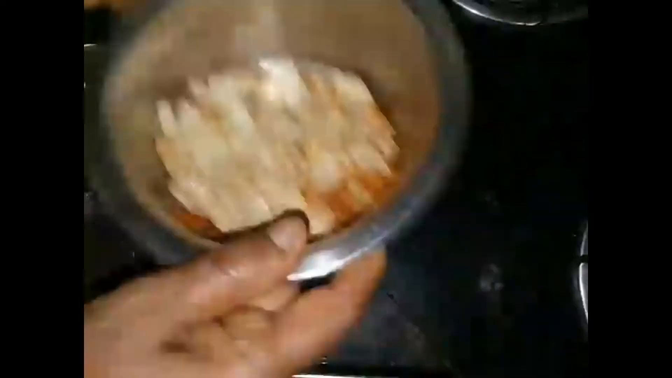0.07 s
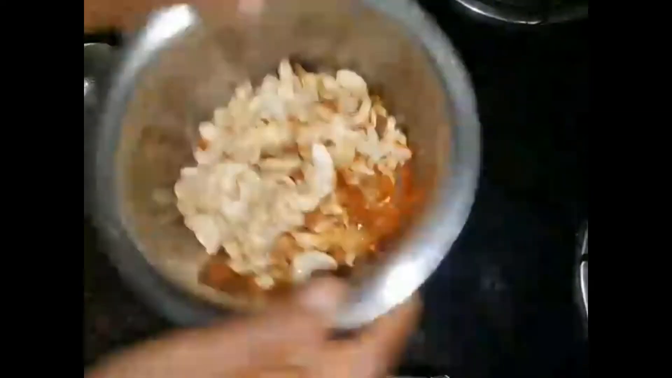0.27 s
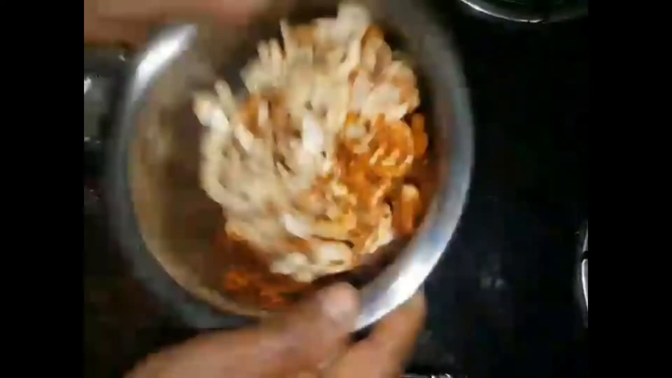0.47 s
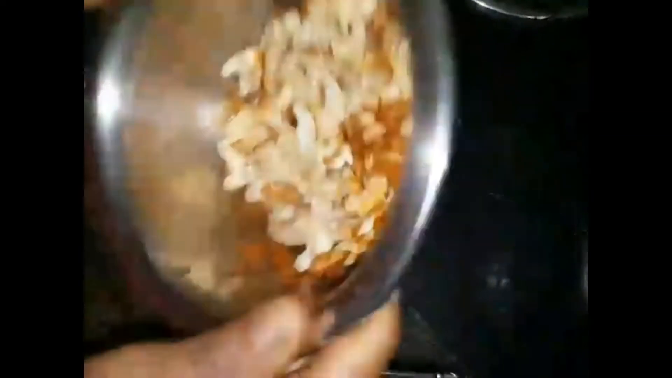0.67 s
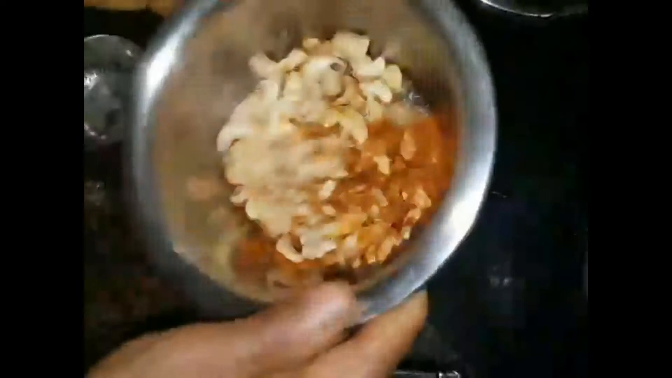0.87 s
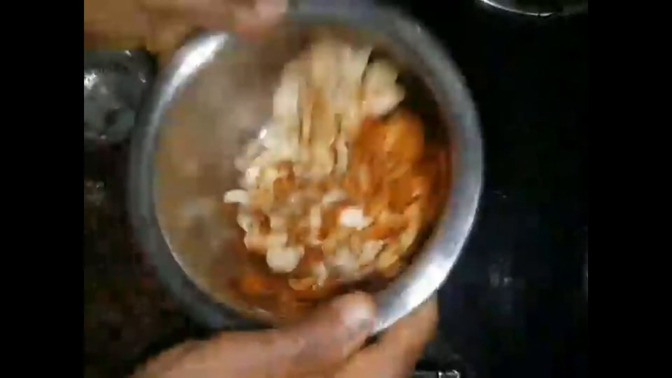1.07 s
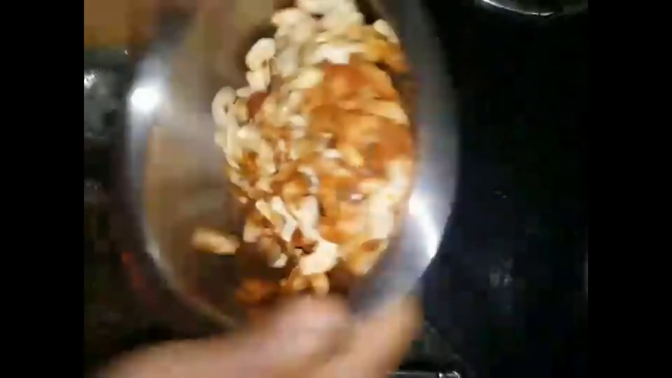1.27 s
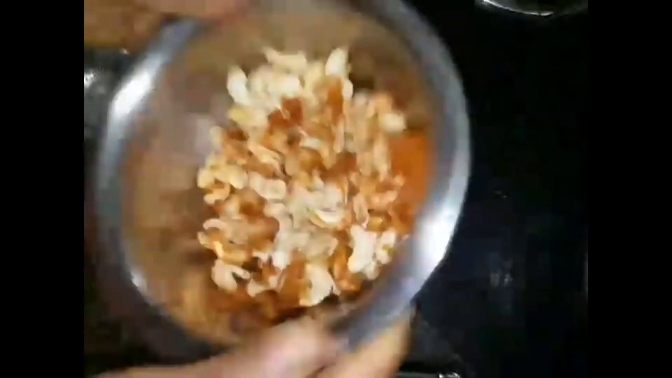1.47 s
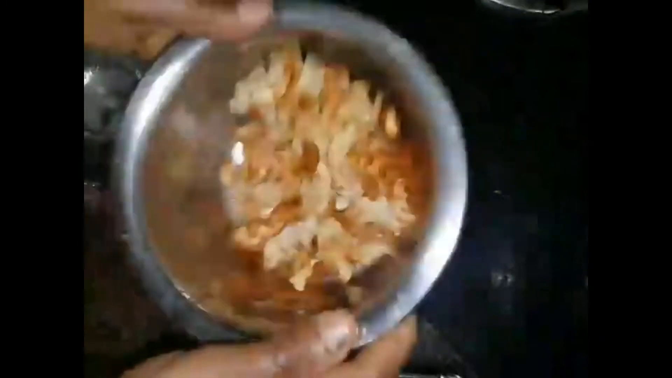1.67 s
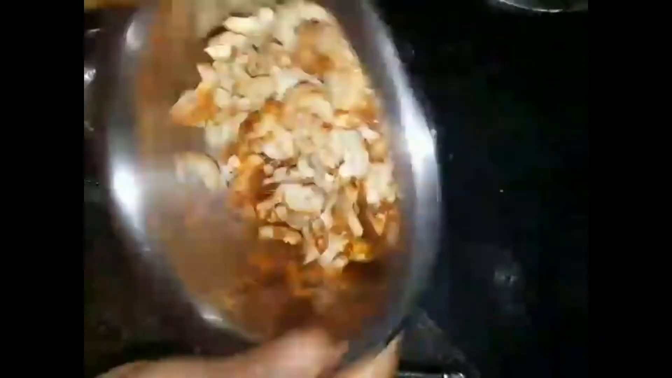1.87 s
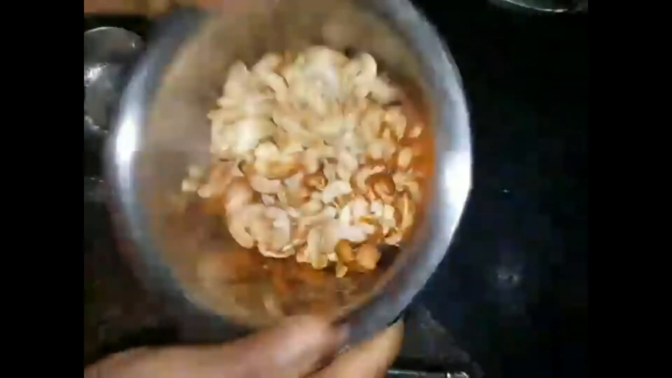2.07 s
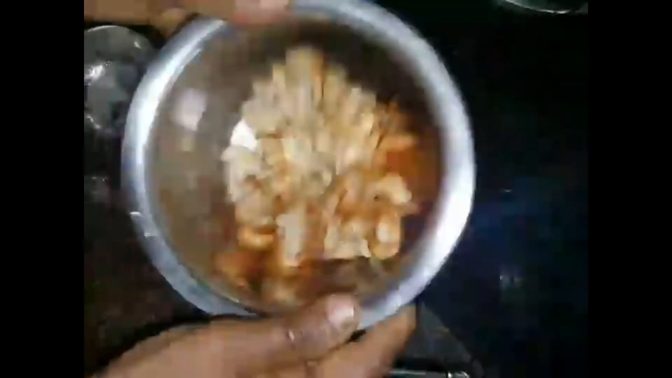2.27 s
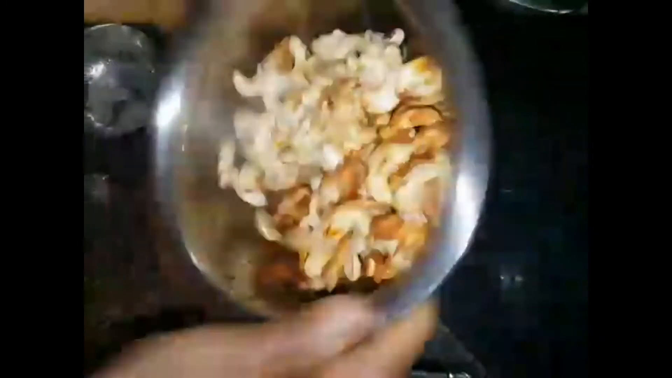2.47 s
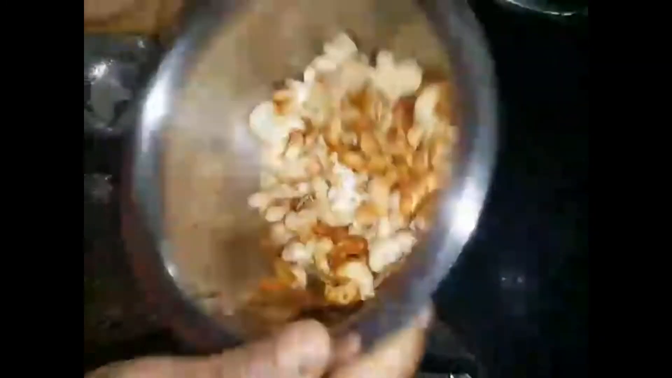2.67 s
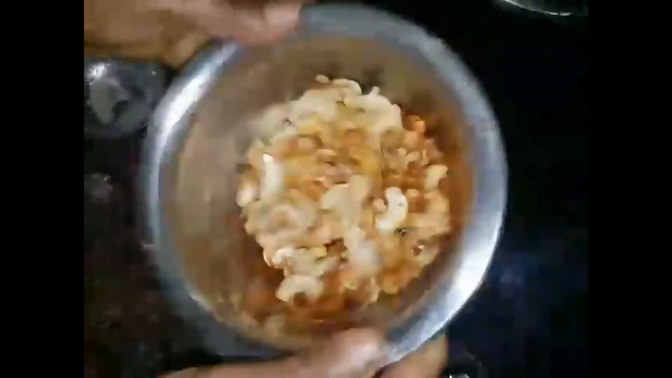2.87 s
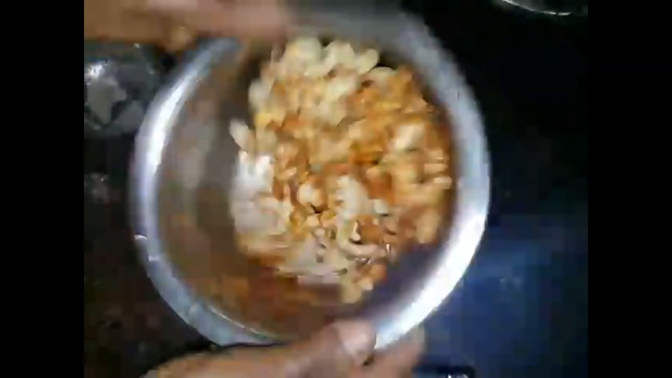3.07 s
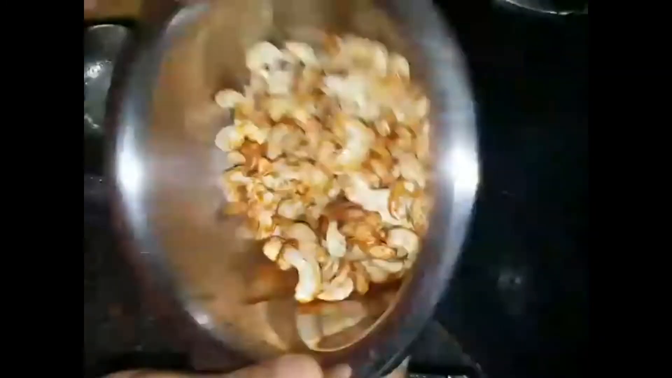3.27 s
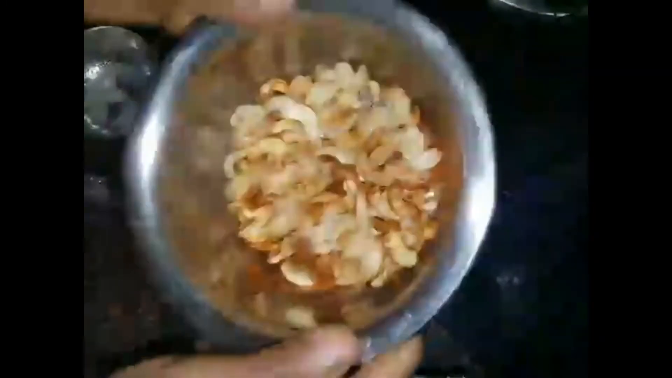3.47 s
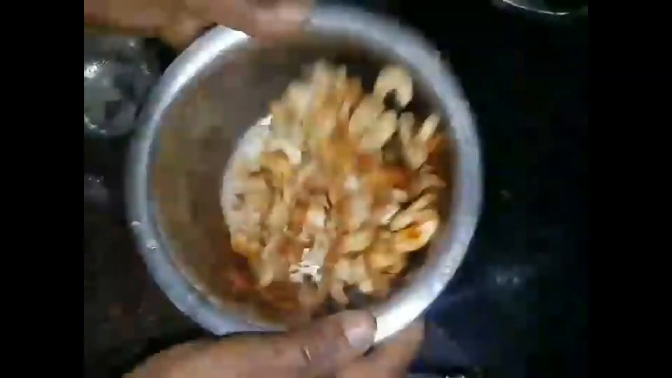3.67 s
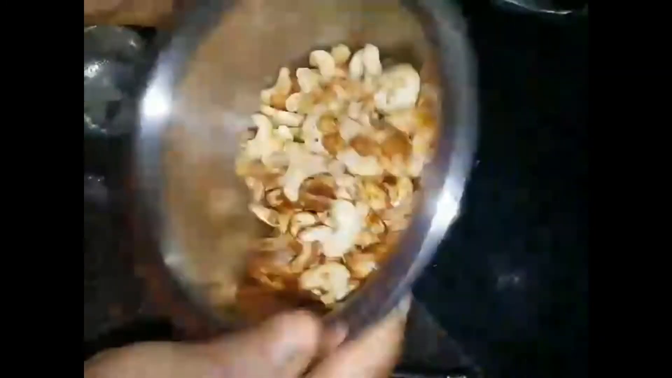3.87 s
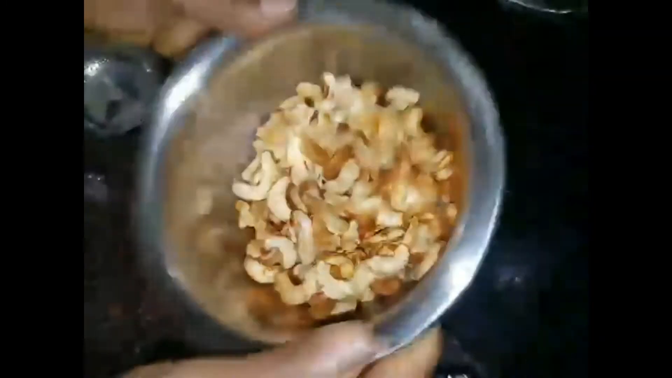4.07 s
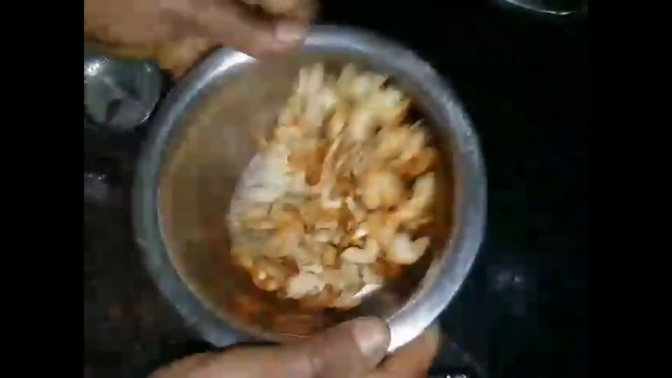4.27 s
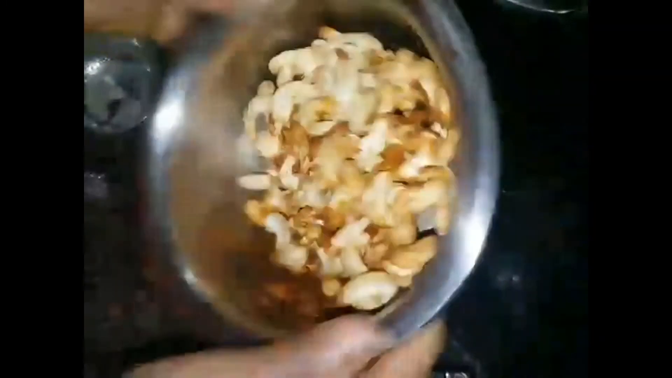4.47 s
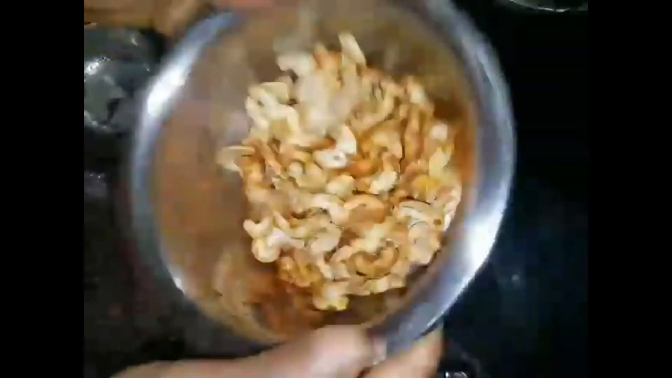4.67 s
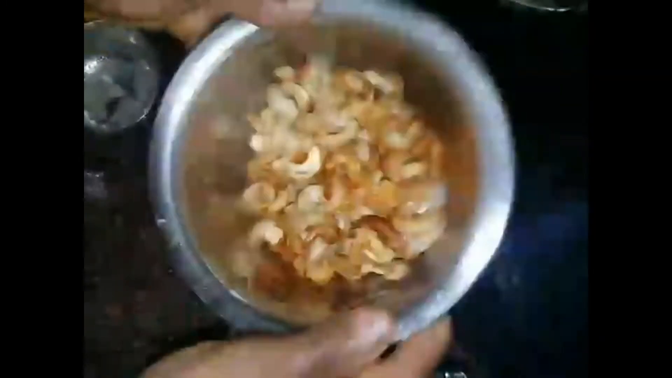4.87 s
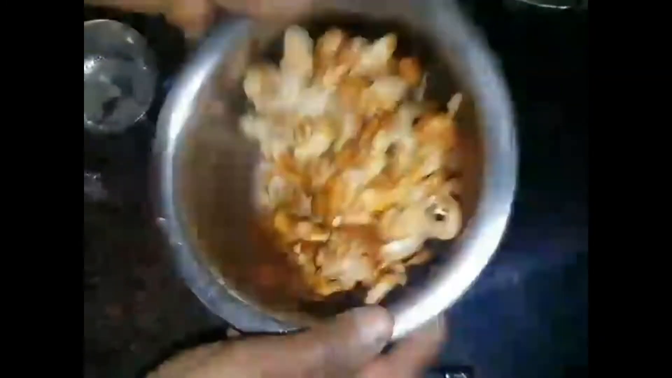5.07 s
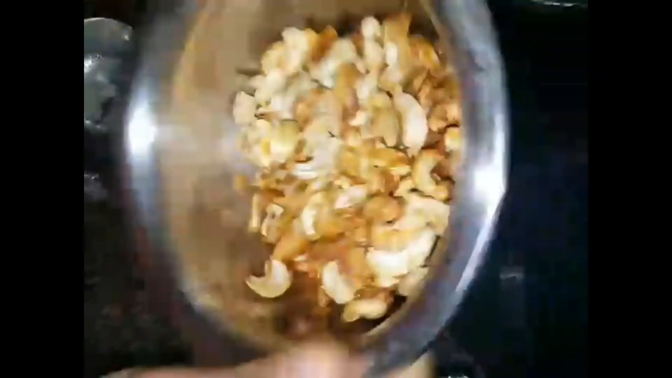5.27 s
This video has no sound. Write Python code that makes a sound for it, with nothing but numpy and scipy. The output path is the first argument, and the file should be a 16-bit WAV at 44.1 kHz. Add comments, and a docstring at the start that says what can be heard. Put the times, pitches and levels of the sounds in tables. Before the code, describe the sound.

Close rhythmic shaking of nuts in a metal bowl, about three and a half tosses a second, with small high clinks over faint room noise.

```python
"""Fried cashews are tossed in a steel bowl, three and a half times a second, close by in a small kitchen.
After three light swirls, each toss thuds onto the base, stray nuts rattle on the wall, then all slide back.
Random impacts drive bowl modes; between landings the nuts roll on and settle, with sparse faint scratches.
Small hard things clink as the hands turn, probably bangles on the wrists: stacks of decaying modes with a tick.
Hard kitchen walls answer through decaying noise, and a steady background of coloured noise lies beneath."""
import sys
import numpy as np
from scipy import signal
from scipy.fft import rfft, irfft, next_fast_len
from scipy.io import wavfile
from scipy.ndimage import uniform_filter1d, map_coordinates

SR = 44100
rng = np.random.default_rng(int(sys.argv[2]) if len(sys.argv) > 2 else 0)


def inscribe(sig):
    """Save sig as 16-bit PCM at rate SR to the path in sys.argv[1].

    A 1-D sig is mono; a 2-D sig holds one channel per row.
    Samples are clipped to [-1, 1] before scaling.
    """
    pcm = np.round(np.clip(np.atleast_2d(sig).T, -1, 1) * 32767)
    wavfile.write(sys.argv[1], SR, pcm.astype(np.int16))


N = 234303  # length in samples

# The landings of the nuts, the first three only light swirls. Each row: start in seconds, base thud in dB,
# wall clang in dB, rattle in dB, seconds until the heap peaks.
LANDINGS = [(0.005, -47, -56, -54.5, 0.024), (0.118, -43, -46, -44.5, .012), (0.232, -45.5, -58, -52, .014),
            (0.508, -18, -26, -24.5, .025), (0.799, -21, -24.5, -28.5, 0.019),
            (1.085, -22.5, -26, -27.5, .009), (1.372, -19.5, -20.5, -25, 0.0065),
            (1.662, -19.5, -24, -24.5, 0.0085), (1.97, -22, -23.5, -25, .019),
            (2.268, -21, -23.5, -26, .012), (2.549, -24, -32.5, -23.5, 0.0091),
            (2.844, -21.5, -22, -27.5, .016), (3.139, -23.5, -24, -26, .013), (3.445, -23, -28, -26, .015),
            (3.72, -23.5, -23, -24.5, .01), (4.021, -24.5, -27.5, -26, 0.019),
            (4.314, -20.5, -22.5, -26, .011), (4.589, -21, -23.5, -24, .012),
            (4.878, -21, -20.5, -24.5, .011), (5.16, -23.5, -23, -22, .01)]
# How alike left and right are. Each row: frequency in Hz, likeness from 0 (unrelated) to 1 (the same).
LIKENESS = [(100, 0.94), (500, 0.78), (800, 0.63), (1300, 0.27), (3000, 0.011), (9000, 0.019)]


def amp(db):
    """Decibels to a linear factor."""
    return 10 ** (np.asarray(db) / 20)


def unit(x):
    """Scale to an RMS of 1 over all channels."""
    return x / np.sqrt(np.mean(x ** 2) + 1e-20)


def norm(x):
    """Scale to a mean energy of 1 per channel."""
    return unit(x) / np.sqrt(x.shape[-1])


def along(points, hz):
    """Read a curve of (Hz, value) points on a log frequency axis."""
    f, v = np.transpose(points)
    return np.interp(np.log(hz + 1), np.log(f), v)


def filtered(x, response):
    """Multiply the spectrum of x by a response of frequency."""
    m = next_fast_len(x.shape[-1] + 8192)
    spectrum = rfft(x, m) * response(np.fft.rfftfreq(m, 1 / SR))
    return irfft(spectrum, m)[..., :x.shape[-1]]


def band(x, lo_hz, hi_hz, order=3):
    """Causal band-pass."""
    sos = signal.butter(order, [lo_hz, min(hi_hz, .49 * SR)], 'band', fs=SR, output='sos')
    return signal.sosfilt(sos, x)


def through(x, response):
    """Convolve, keeping the length."""
    return signal.fftconvolve(np.atleast_2d(x), response, axes=1)[:, :x.shape[-1]]


def add(out, s, x):
    """Mix x into out at time s."""
    i = max(round(s * SR), 0)
    out[:, i:i + x.shape[-1]] += x[:, :N - i]


def noise(spectrum, size):
    """Coloured stereo noise, alike in the bass and nearly unrelated in the treble."""
    def mid_side(hz):
        turn = np.arccos(np.clip(along(LIKENESS, hz), -1, 1)) / 2
        return amp(along(spectrum, hz)) * [np.cos(turn), np.sin(turn)]

    mid, side = filtered(rng.standard_normal((2, size)), mid_side)
    return unit(np.array([mid + side, mid - side]))


def wobble(rate):
    """A smooth random curve, rate knots a second."""
    knots = rng.standard_normal(int(N * rate / SR) + 4)
    return map_coordinates(knots, [np.arange(N) * rate / SR])


def ringing(modes, t, scatter_db, detune, glide):
    """Damped modes at new strengths, bending as their load shifts; high ones differ in phase left and right."""
    hz, db, t60 = np.transpose(modes)[:, :, None]
    z = rng.standard_normal((5, len(modes), 1))
    lag = z[3:] * np.arccos(np.clip(along(LIKENESS, hz), -1, 1)) * 0.54  # one lag per channel
    phase = 2 * np.pi * hz * t * (1 + detune * z[1] + glide * z[2] * t)
    strength = amp(db + scatter_db * z[0] - 60 * t / t60)
    return np.sum(strength * np.sin(phase + lag), axis=1)


def contacts(size, rate, spread_db):
    """Random impacts of uneven force and either sign, rate a second on average."""
    force = amp(spread_db * np.clip(rng.standard_normal(size), -2, 2))
    return force * rng.choice([-1, 1], size) * (rng.random(size) < rate / SR)


def background():
    """Steady kitchen background: wide coloured noise plus a low band of the same colour."""
    # The colour before band-passing. Each row: frequency in Hz, relative level in dB.
    hum_colour = [(15, -51), (25, -22), (139, -4.5), (394, -1.5), (621, -9), (1280, -9.5), (2020, -8.5),
                  (2300, -49), (3540, -13), (4380, -33), (8780, -12.5), (10600, -49), (15000, -9.5)]
    wide = amp(-44) * band(noise(hum_colour, N), 30, 9700, order=1)
    low = amp(-55.5) * unit(band(noise(hum_colour, N), 86, 155, order=2))
    return wide + low


def bowl(pulses, ring, damped_t60, damped_db, count=3):
    """Nuts drive the free modes (ring scales their life); each place struck adds its own dense, choked modes."""
    # The free bowl, base modes first, then the wall.
    # Each row: frequency in Hz, relative level in dB, t60 in seconds before the scaling by ring.
    free_modes = [(522, -17, .2), (585, -5, .22), (622, 1, .26), (645, -6, .15), (684, -4, .17),
                  (754, -3, .28), (796, -4, .4), (828, -5, .3), (856, -5, .3), (1393, -16, .15),
                  (1771, -17, .2), (2020, -9, .2), (2065, -10, .18), (2113, -10, .25), (2300, -17, .25),
                  (2730, -12, .2), (2775, -15, .2), (2950, -17, .2), (3540, -16, .18), (3595, -11, .18),
                  (4000, -18, .12)]
    # Dense, quickly damped modes under the heap. Each row: frequency in Hz, relative level in dB.
    choked_modes = [(430, -24), (540, -15), (620, 0), (830, -2), (910, -11), (1250, -14), (1900, -14),
                    (2070, -4), (2300, -14), (2780, -12), (3250, -21), (3580, -11), (3850, -21),
                    (4300, -25)]
    t, short = np.arange(SR // 5) / SR, np.arange(SR // 24) / SR
    loaded = [(hz, db, t60 * ring) for hz, db, t60 in free_modes]
    out = through(pulses, norm(ringing(loaded, t, scatter_db=1.5, detune=.007, glide=.05)))
    place = rng.integers(count, size=len(pulses))
    for k in range(count):
        choked = norm(noise(choked_modes, len(short)) * amp(-60 * short / damped_t60))
        out += amp(damped_db) * through(pulses * (place == k), choked)
    return out


def scrape(t, squeal_db):
    """One nut slipping on the steel: a short noise scratch and a high ring of damped modes."""
    # Nuts scratching on steel. Each row: frequency in Hz, relative level in dB.
    scratch_colour = [(3000, -4.5), (4400, -8), (5200, -6), (6200, -3.5), (6900, 7), (7500, 1), (8000, -5),
                      (8900, -6), (10300, -15), (12700, -9), (15000, -6.5), (16500, -42)]
    # High modes that scraping excites. Each row: frequency in Hz, relative level in dB, t60 in seconds.
    squeal_modes = [(4650, -6, .1), (5930, -5, .07), (6590, -4, .15), (6890, 0, .12), (7100, -4, .1),
                    (7520, -1, .07), (8250, -10, .06)]
    scratch = norm(noise(scratch_colour, len(t)) * amp(-60 * t / 0.023))
    squeal = norm(ringing(squeal_modes, t, scatter_db=1, detune=0.0072, glide=0.036))
    return scratch + amp(squeal_db) * squeal


ROLL_DB, SCRATCH_DB = -42, -51  # rolling on the bowl and scratching, before the settling and the waver
SCRATCH_WAVER_DB, WAVER_DB = -2, -2.2  # dB per unit of random curve: the scratches alone, then both layers
SETTLE_DB_PER_S = 31  # they come to rest until the next landing


def shuffle():
    """Oily nuts roll on over each other and the steel after each landing and settle, with faint scratches."""
    t, now = np.arange(SR // 6) / SR, np.arange(N) / SR
    stirred = np.array([0] + [row[0] for row in LANDINGS])
    last_stirred = stirred[np.searchsorted(stirred, now, 'right') - 1]
    age = uniform_filter1d(now - last_stirred, size=1024)
    loudness = amp(WAVER_DB * wobble(8) - SETTLE_DB_PER_S * age)
    impacts = contacts(N, rate=320, spread_db=1.5)
    rolling = unit(bowl(impacts, ring=0.5, damped_t60=0.022, damped_db=1.5))
    slips = contacts(N, rate=220, spread_db=5) * amp(SCRATCH_WAVER_DB * wobble(25))
    scratching = unit(through(slips, scrape(t, squeal_db=0.5)))
    return loudness * (amp(ROLL_DB) * rolling + amp(SCRATCH_DB) * scratching)


def swell(t, peak_s, sharp, hold_s, fall_db_per_s):
    """A shower that builds until about peak_s, holds and thins out."""
    rise = np.minimum(t / max(peak_s, .004), 1) ** sharp
    return rise * amp(-fall_db_per_s * np.maximum(t - peak_s - hold_s, 0))


KNOCK_GAP_S, KNOCK_DB, KNOCK_SPREAD_DB = .011, 8, 4  # lesser knocks: mean spacing, mean level, scatter


def knocks(start, heap_s, size, count=4):
    """Hard contacts of the landing at start: the loud ones, and a few lesser ones at uneven intervals."""
    # Single nuts that strike bare steel and stand out of a landing.
    # Each row: start in seconds, level in dB before the trim of each layer.
    loud_knocks = [(0.5462, 13), (0.5701, 7), (0.8261, 14), (1.1193, 15), (1.3775, 12.5), (1.6944, 12),
                   (2.0241, 6), (2.296, 13), (2.5742, 11), (2.8793, 13), (2.8927, 11), (3.1739, 12),
                   (3.4597, 13.5), (3.7517, 12.5), (4.0739, 1), (4.338, 11.5), (4.629, 12), (4.9138, 12),
                   (5.1977, 8)]
    gaps = KNOCK_GAP_S * (.2 + 1.6 * rng.random(count))
    lesser_db = KNOCK_DB + KNOCK_SPREAD_DB * rng.standard_normal(count)
    lesser = zip(heap_s / 2 + np.cumsum(gaps), lesser_db)
    loud = [(s - start, db) for s, db in loud_knocks if 0 <= s - start < .2]
    times, db = np.transpose(list(lesser) + loud)
    force = amp(db) * rng.choice([-1, 1], len(db))
    return np.bincount(np.round(times * SR).astype(int), force, size)[:size]


EDGE_DB, EDGE_DB_PER_S = 2, 700  # first touch under the heap: weaker the longer the heap takes to land
RATTLE_LAG_S, SLIDE_LAG_S = 0.017, 0.021  # rattle and slide peak this long after the heap
SLIDE_DB = -10.5  # slide level over the rattle
# Each shower holds this long after its peak, then thins out.
HEAP_HOLD_S, HEAP_FALL_DB_PER_S = 0.0082, 405
RATTLE_HOLD_S, RATTLE_FALL_DB_PER_S = 0.03, 282
SLIDE_HOLD_S, SLIDE_FALL_DB_PER_S = 0.031, 268


def tosses():
    """The soft heap lands first and drives the low modes; hard single nuts and the slide follow."""
    out, t = np.zeros((2, N)), np.arange(SR // 3) / SR

    def level(x, db):  # sets each channel in dB over a tenth of a second
        return amp(db) * np.array([norm(channel) for channel in x]) * np.sqrt(SR / 10)

    def shower(envelope, rate, spread_db):
        return norm(contacts(len(t), rate, spread_db) * envelope)

    for s, thud_db, clang_db, rattle_db, heap_s in LANDINGS:
        hard = knocks(s, heap_s, len(t))
        # the leading edge touches down
        first = amp(EDGE_DB - EDGE_DB_PER_S * heap_s) * signal.unit_impulse(len(t))

        heap_swell = swell(t, heap_s, 0.37, HEAP_HOLD_S, HEAP_FALL_DB_PER_S)
        stray_swell = swell(t, heap_s + RATTLE_LAG_S, 0.38, RATTLE_HOLD_S, RATTLE_FALL_DB_PER_S)
        slide_swell = swell(t, heap_s + SLIDE_LAG_S, 1.9, SLIDE_HOLD_S, SLIDE_FALL_DB_PER_S)
        heap = shower(heap_swell, rate=1200, spread_db=3.5)
        strays = shower(stray_swell, rate=500, spread_db=2.0)
        slips = shower(slide_swell, rate=520, spread_db=5.5)
        heap += amp(-16.5) * hard + first
        strays += amp(-13.5) * hard + amp(-8.5) * first
        slips += amp(-28) * hard

        boom = bowl(heap, ring=0.53, damped_t60=0.034, damped_db=3)
        base, wall = band(boom, 560, 715), band(boom, 730, 920)
        rattle = band(bowl(strays, ring=0.55, damped_t60=0.063, damped_db=-1.5), 859, 4050)
        slide = through(slips, scrape(t, squeal_db=-9.5))
        recoil = band(heap[None], 78, 640, order=2)  # the whole bowl recoils in the hands
        x = level(base, thud_db) + level(wall, clang_db)
        x += level(rattle, rattle_db) + level(slide, rattle_db + SLIDE_DB)
        x += level(recoil, thud_db - 24.0)
        add(out, s, x)
    return out


def place_bowl(nuts):
    """Left and right levels of the bowl, set by frequency: mostly to the left, the treble a little right."""
    # Each row: frequency in Hz, left over right in dB.
    left_over_right = [(120, 2.5), (450, 7.5), (740, 0.5), (1200, 12), (2000, 8), (3300, 1), (5500, 6),
                       (9000, -0.5), (15000, -1.5)]
    return filtered(nuts, lambda hz: amp(np.outer([1, -1], along(left_over_right, hz)) / 2))


CLINK_PAN_DB, CLACK_PAN_DB, PAN_SPREAD_DB = 3, 8, 4.5  # mean left over right, and its scatter


def bangles(hits, modes, side_db, gain_db, tick_db, detune, count):
    """Each touch runs through a stack of nearly equal rings, which chatter for a few milliseconds."""
    out, t = np.zeros((2, N)), np.arange(SR // 12) / SR
    for s, db, top_db in hits:
        pan_db = side_db + PAN_SPREAD_DB * rng.standard_normal()
        pan = amp([[pan_db / 2], [-pan_db / 2]])
        struck = [(hz, mode_db + (top_db if hz > 11000 else 0), t60) for hz, mode_db, t60 in modes]
        delays = np.cumsum(rng.exponential(.002, count))  # mean gap in seconds
        for k, delay in enumerate(delays - delays[0]):
            ring = ringing(struck, t, scatter_db=2.5, detune=detune, glide=0)
            tick = band(rng.standard_normal((2, len(t))), 3500, 22000, order=2)
            tick = tick * amp(tick_db - 60 * t / 0.067)
            strength = amp(db + gain_db - 7 * k)  # each further ring is 7 dB softer
            add(out, s + delay, strength * pan * (ring / np.abs(ring).max() + tick))
    return out


def thick_clacks():
    """A thicker bangle gives short, duller clacks, mostly just before a landing."""
    # Each row: start in seconds, level in dB before the gain, trim of the overtones above 11 kHz in dB.
    clacks = [(0.1381, -19.5, 1), (0.78, -32.5, 9), (1.716, -30, -4), (1.8986, -22.5, 6),
              (2.2193, -25.5, 0), (2.5263, -23.5, 2), (2.817, -21, 3), (3.1143, -27, -1),
              (3.3892, -22.5, -4), (3.4825, -18.5, -9), (3.702, -21, -3), (3.9653, -21.5, -7),
              (4.5291, -30.5, 17), (5.0864, -29.5, -10)]
    # Modes of the thicker bangle. Each row: frequency in Hz, relative level in dB, t60 in seconds.
    thick_modes = [(3465, -14, .06), (5170, -14, .05), (7230, 0, .045), (8830, -5, .05), (9430, -5, .04),
                   (11820, -11, .04), (14230, -3, .04), (15230, -8, .03)]
    return bangles(clacks, thick_modes, CLACK_PAN_DB, gain_db=2, tick_db=-18, detune=0.0037, count=2)


TURN_S, JINGLE_S = .147, 0.077  # the wrists turn this long after a landing, and jingle for this long
JINGLE_DB, JINGLE_SPREAD_DB = -34, 2.5  # mean level before the clink gain, and its scatter


def jingles(count=2):
    """Soft clinks as the wrists turn round after each landing: rows like those of the loud ones."""
    rows = []
    for s, *_ in LANDINGS:
        delays = TURN_S + JINGLE_S * (np.arange(count) + rng.random(count)) / count
        force, colour = rng.standard_normal((2, count))
        rows += zip(s + delays, JINGLE_DB + JINGLE_SPREAD_DB * force, 4 * colour)
    return [row for row in rows if row[0] < (N - SR // 20) / SR]


def thin_clinks():
    """Thin bangles ring high and bright: the loudest clinks, and the soft jingles between them."""
    # Each row: start in seconds, level in dB before the gain, trim of the overtones above 11 kHz in dB.
    clinks = [(0.33, -16.5, 2.5), (0.4684, -26, -8), (0.4866, -21.5, -1), (0.6414, -20.5, -3),
              (0.9578, -23, -5), (0.9948, -16.5, 4), (1.1004, -24.5, 7), (1.2333, -19, -8),
              (1.332, -24.5, 8), (1.4416, -18.5, 4), (1.4835, -19.5, -5), (1.6503, -20.5, 3),
              (1.83, -23.5, 7), (1.8965, -19.5, -1), (2.4393, -22, 11), (2.622, -31, 1), (2.694, -15.5, 4),
              (3.0069, -21.5, -1), (3.025, -21, 1), (3.2838, -25.5, 3), (3.3272, -19.5, -1),
              (3.5883, -26.5, -11), (3.62, -21.5, -6), (3.8699, -15.5, 8), (3.8986, -19.5, -25),
              (4.0783, -26, 3), (4.1786, -25.5, -4), (4.2264, -21.5, 8), (4.4607, -19.5, 3),
              (4.4827, -22, -7), (4.5294, -19.5, -8), (4.7625, -24.5, 14), (4.7835, -22, 0),
              (4.981, -22, -1), (5.264, -20, 4)]
    # Modes of the thin bangles. Each row: frequency in Hz, relative level in dB, t60 in seconds.
    thin_modes = [(3470, -24, .1), (4700, -22, .07), (7880, -16, .07), (8790, 0, .06), (8970, 0, .07),
                  (9480, -12, .05), (10000, -16, .05), (12630, -7, .1), (14100, -8, .05), (14380, 1, .07),
                  (15000, -12, .07)]
    hits = clinks + jingles()
    return bangles(hits, thin_modes, CLINK_PAN_DB, gain_db=-1.0, tick_db=-18.5, detune=0.0075, count=3)


def kitchen(x):
    """Hard walls answer after a few milliseconds with decaying noise; the treble dies before the mids."""
    # Each row: frequency in Hz, t60 in seconds.
    decay = [(150, 0.26), (700, 0.52), (2500, 0.5), (7000, 0.29), (15000, 0.26)]
    flat = noise([(100, 0), (10000, 0)], SR // 2)
    hz, t, z = signal.stft(flat, SR, nperseg=256)
    fading = z * amp(-60 * t / along(decay, hz)[:, None])
    tail = signal.istft(fading, SR, nperseg=256)[1]
    return through(x, np.pad(norm(tail), ((0, 0), (SR // 200, 0))))


def scene():
    """The bowl is a little to the left, the wrists on both sides of it, all in the kitchen."""
    nuts = place_bowl(tosses() + shuffle())
    wrists = thick_clacks() + thin_clinks()
    echoes = amp(-13.0) * kitchen(nuts) + amp(-7) * kitchen(wrists)
    return nuts + wrists + echoes + background()


TOP_HZ = 15400  # top of the sound's range


def record(dry):
    """Nothing is heard above about 15.4 kHz."""
    return filtered(dry, lambda hz: 1 / np.sqrt(1 + (hz / TOP_HZ) ** 120))


dry = scene()
out = record(dry)
inscribe(out)
```